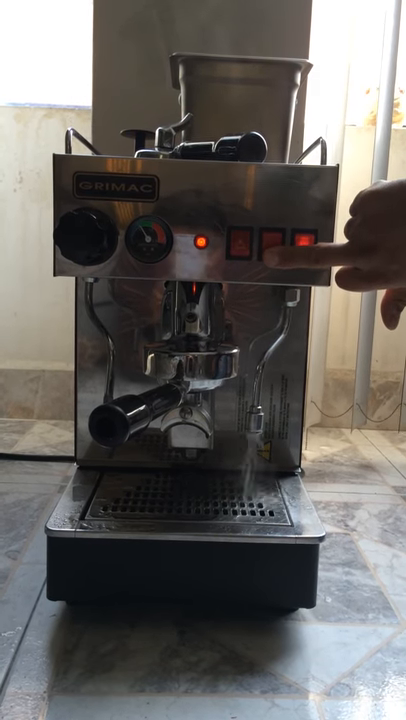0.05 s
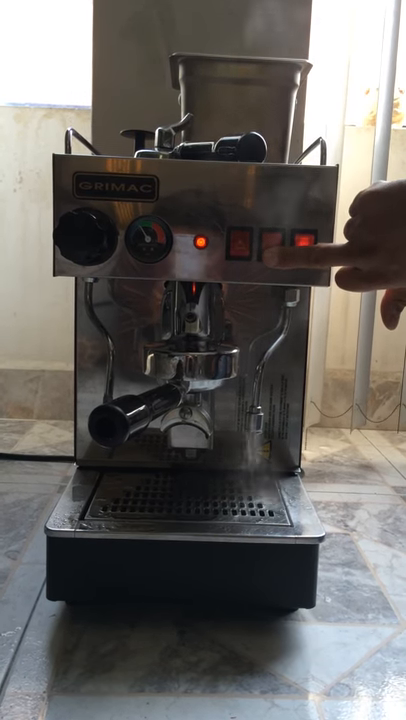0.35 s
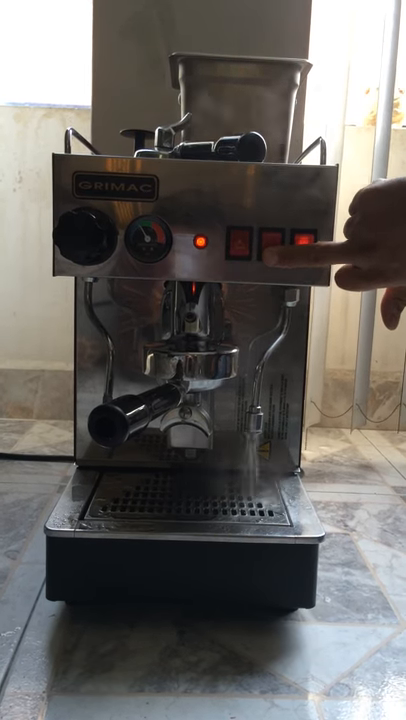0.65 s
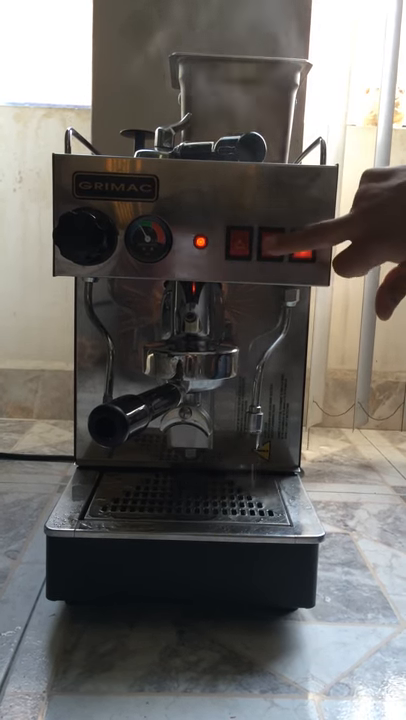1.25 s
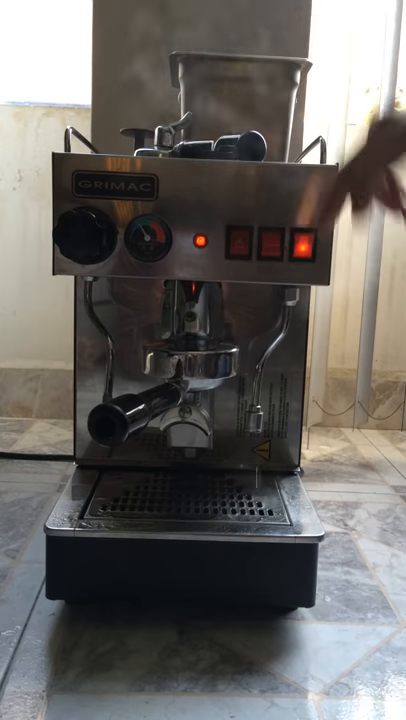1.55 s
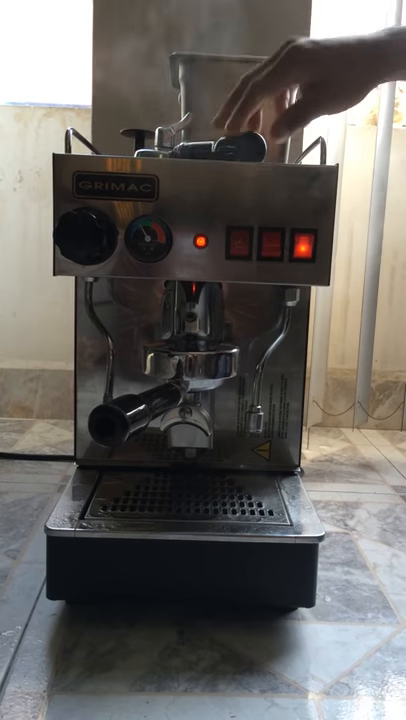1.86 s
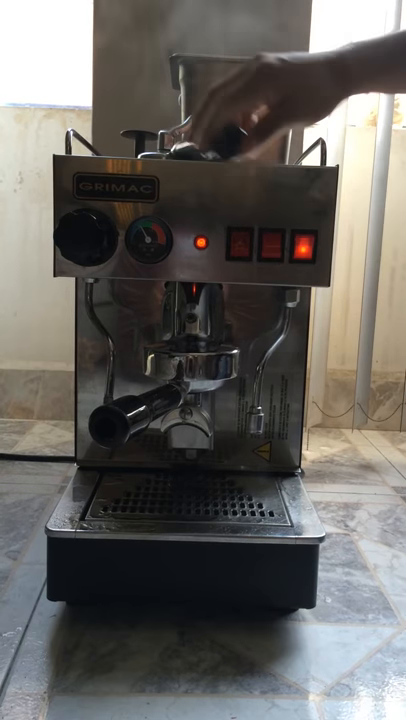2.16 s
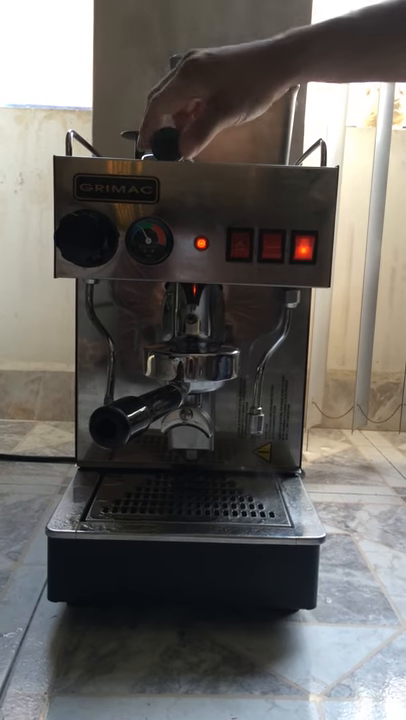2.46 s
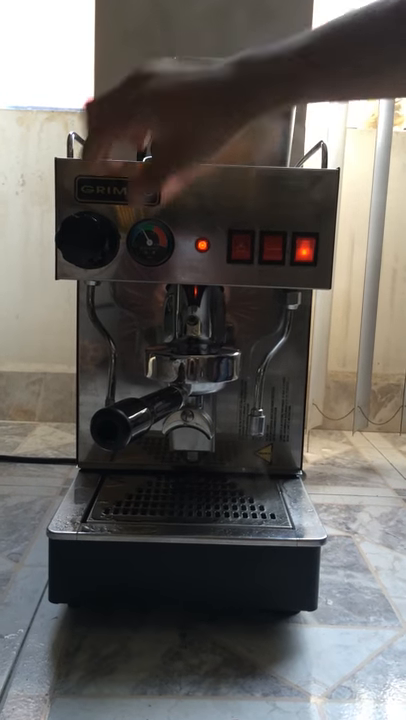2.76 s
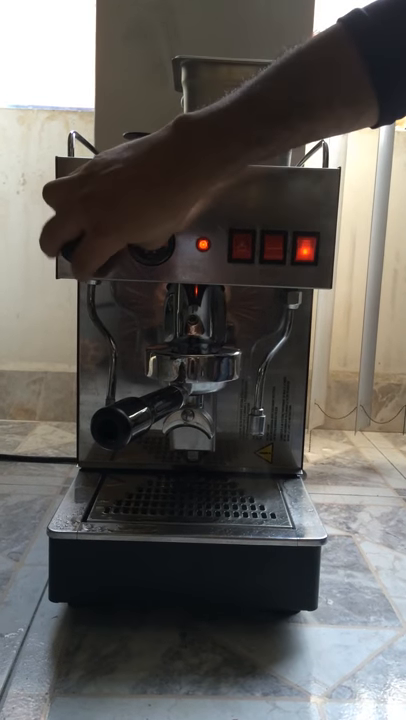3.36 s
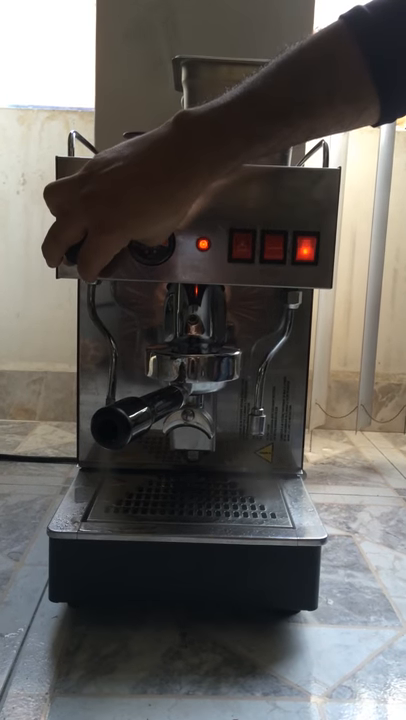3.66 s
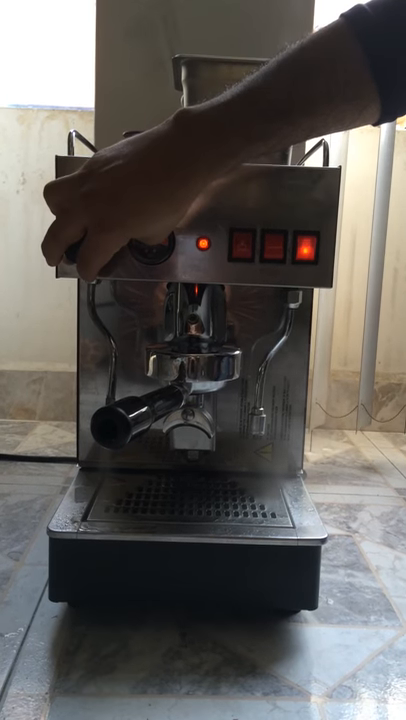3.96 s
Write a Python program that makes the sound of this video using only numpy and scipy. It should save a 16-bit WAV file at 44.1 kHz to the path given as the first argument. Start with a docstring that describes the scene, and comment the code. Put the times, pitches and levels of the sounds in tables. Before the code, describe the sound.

An espresso machine spits water, then blasts hissing steam after a metal lever clack.

```python
"""A tiled room, one microphone close to an espresso machine. Boiling water sputters from the spout
into the drip tray and is shut off. A lever on top scrapes round its seat and clacks home, ringing
the metal and thumping the case; then the steam valve is turned open and the jet hisses hard from
the wand. Under it all: a low hum, a thin boiler sizzle and faint ticks."""
import sys
import numpy as np
from scipy import signal
from scipy.fft import rfft, irfft
from scipy.io import wavfile
from scipy.ndimage import uniform_filter1d

SR = 44100
rng = np.random.default_rng(int(sys.argv[2]) if len(sys.argv) > 2 else 0)


def pcm_store(signal):
    """Save signal as 16-bit PCM."""
    levels = np.round(np.clip(np.atleast_2d(signal), -1, 1) * 32767)
    wavfile.write(sys.argv[1], SR, levels.astype(np.int16).T)


N = 176400

# Levels in the tables are relative; a tone is a spectrum, its levels given per hertz.
ROOM_DECAY = [(100, 0.7), (500, 0.52), (2000, 0.38), (5000, 0.33), (15000, 0.25)]  # reverberation off the tiles: frequency_hz, t60_s

SPURTS = [(0, 0.017, 0.5), (.021, 0.0076, 0.5), (.036, 0.0061, 0.5), (.046, 0.011, 0.5),
          (.069, 0.018, -3.5), (.096, 0.024, 0), (.128, 0.014, -2), (.154, 0.016, 1), (.181, 0.023, -3),
          (.198, 0.018, -4.5), (.222, 0.013, 3), (.2575, .015, 1), (.278, 0.026, 1.5), (.31, 0.0096, 0.5),
          (.328, 0.013, 1), (.347, 0.024, 1), (.381, 0.02, 0.5), (.404, 0.014, -1.5), (.428, 0.011, -0.5),
          (.458, 0.003, 2), (.466, 0.011, -1), (.498, 0.022, 1.5), (.536, 0.0035, 3), (.545, 0.0076, -2.5),
          (.559, 0.021, -0.5), (.583, 0.0076, -3.5), (.598, 0.011, 2), (.627, 0.014, 1.5),
          (.649, 0.019, -4), (.666, 0.019, -1), (.696, 0.033, 1.5), (.741, 0.011, 0), (.756, 0.016, -1),
          (.779, 0.025, -3.5), (.819, 0.007, -3.5), (.835, 0.024, -5.5)]  # spurts of water and steam: start_s, length_s, level_db
STEAM_POCKETS = [(0.07, -27.5), (.132, -23.5), (0.225, -20.5), (0.232, -22.5), (0.26, -17), (0.31, -20),
                 (0.319, -14.5), (0.395, -17), (0.539, -19), (0.563, -20), (0.57, -23.5), (0.628, -17),
                 (.636, -17), (0.697, -17), (.703, -17), (0.722, -23), (.759, -16.5), (0.766, -20),
                 (.801, -19.5)]  # pockets bursting in the spout: time_s, level_db
SPRAY_TONE = [(41, -36), (70, -9.5), (104, -19), (151, -13), (215, -20.5), (306, -29), (387, -10.5),
              (445, -11.5), (481, -30), (563, -5), (609, -18), (672, -8), (957, -32.5), (1170, -13.5),
              (1310, -25.5), (1510, -8), (2560, -7), (3060, -14.5), (3240, -9), (3790, -5), (4350, 2),
              (5000, -6.5), (5300, -9), (6980, -12.5), (7700, -23), (10000, -52)]  # water leaving the spout: frequency_hz, level_db
SPOUT_MODES = [(2139, 43, -6), (2504, 32, -11), (2625, 18, -7), (3261, 91, -5.5), (4470, 240, -2),
               (4990, 37, -2.5), (5650, 310, -8.5), (6350, 130, -11.5)]  # resonances of the spout: pitch_hz, width_hz, level_db
SPLASH_TONE = [(60, -14), (170, 2.5), (300, -11.5), (420, -4), (680, 1.5), (950, -9), (1700, -4),
               (2600, 4.5), (4000, -21)]  # water on the tray: frequency_hz, level_db
MIST_TONE = [(6500, -5.5), (8700, -0.5), (10500, -4), (12500, -3), (14600, 1), (15400, -0.5)]  # fine spray of each spurt: frequency_hz, level_db
# a knock as the water shuts off, then a faint switch click: start_s, length_s, level_db
KNOCK_AND_CLICK = [(.926, .006, -39.5), (1.091, 0.01, -62.5)]
KNOCK_TONE = [(250, -9), (600, -13), (1000, 3.5), (1600, 4), (2400, -7), (3200, -0.5), (4500, -7),
              (7000, -18), (15000, -33)]  # that knock and click: frequency_hz, level_db

RUMBLE_TONE = [(25, -9), (45, -4), (80, 2), (140, 2.5), (200, -7), (290, -13), (400, -10), (500, -8.5),
               (620, -16), (800, -23.5)]  # room rumble: frequency_hz, level_db
RUMBLE_LEVELS = [(0, -53), (1.4, -55.5), (2.1, -54.5), (3.1, -54.5), (4, -57)]  # its slow drift: time_s, level_db
AIR_TONE = [(700, 0), (1000, -2.5), (1500, -2.5), (2200, -3), (3000, -8), (4500, -11), (7000, -17),
            (10000, -19.5), (15400, -21)]  # steady room hiss: frequency_hz, level_db
HUMS = [(1.04, 1.446, 98.4, 5.02, -47.5), (1.5, 1.7, 96.5, 3.05, -49), (1.68, 1.846, 153.8, 2.97, -51),
        (1.9, 2.32, 150.3, 2.97, -49.5), (.97, 1.55, 140.4, 25, -54), (1.3, 1.62, 51.6, 15, -55),
        (0, 3.5, 240, 3, -68), (0, 4.6, 333, 4, -67.5), (0, 3.1, 447, 5, -65.5), (0, 3.6, 500, 40, -67),
        (0, 4.1, 2070, 140, -78), (0, 2.3, 2075, 50, -73), (2.135, 2.215, 8915, 120, -78)]  # hums, sizzle and a brief squeak: start_s, end_s, pitch_hz, width_hz, level_db
RINGING_TICKS = [(1.093, -52), (1.304, -59), (1.446, -59), (1.684, -60), (1.966, -60), (2.04, -56),
                 (2.159, -53.5), (2.2713, -50.5), (2.521, -52), (2.721, -50.5), (2.822, -52.5),
                 (2.891, -51.5), (3.036, -51.5), (3.107, -52.5)]  # faint ticks that ring: start_s, level_db
DRY_TICKS = [(1.502, -60), (1.647, -55.5), (1.94, -54.5), (2.866, -60)]  # thin dry ticks: start_s, level_db

LEVER_SLIDES = [(2.2925, 0.026, -40.5), (2.314, 0.044, -39.5), (2.355, 0.013, -46.5)]  # the lever on its metal seat: start_s, length_s, level_db
SCRAPE_TONE = [(130, -4), (200, 10.5), (330, 3), (700, -7.5), (1000, 4), (1450, -6.5), (1850, 1.5),
               (2300, -5.5), (2650, -1.5), (3600, -9), (7000, -12.5), (10000, -19), (15000, -23)]  # its friction: frequency_hz, level_db
CASE_MODES = [(146.7, -1.5, 0.15), (177, 0.5, 0.22), (214.8, 1.5, .19), (387, 0, 0.069), (573, -5, 0.14)]  # resonances of the case: pitch_hz, level_db, t60_s
LEVER_HITS = [(2.5652, 0.0065, -32, -40), (2.5743, 0.014, -33, -39), (2.5945, 0.01, -37, -33),
              (2.60944, 0.0099, -36, -41), (2.6282, 0.0043, -52, -33.5)]  # hit on the stop and rebounds: start_s, length_s, level_db, thump_db
LEVER_MODES = [(815, -5, 0.1), (1052, 0, .1), (1093, -1.5, .07), (1277, -1.5, 0.12), (1540, -3, 0.1),
               (1880, -5, .08), (2012, 4.5, 0.115), (2482, -3, .1), (3101, -9, .13), (3327, -11, .13),
               (4210, -14, 0.13), (5475, -16, 0.15), (5798, -17, .19)]  # resonances of the lever: pitch_hz, level_db, t60_s
CRACK_TONE = [(200, -18), (550, -2), (720, -5), (1080, 6.5), (1500, -3.5), (2000, 1.5), (2250, -8),
              (2500, -1), (3000, -7.5), (6000, -15), (9000, -22), (15000, -27)]  # lever meeting stop: frequency_hz, level_db

STEAM_VALVE = [(3.286, -79, -90), (3.298, -50.5, -65), (3.335, -45, -60), (3.372, -36, -57.5),
               (3.45, -32.5, -54), (3.567, -27, -44.5), (3.588, -21, -39), (3.66, -21.5, -37),
               (3.85, -21.5, -38.5), (4, -23, -42)]  # the valve opening: time_s, hiss_db, rush_db
HISS_TONE = [(1470, -42), (2500, -13.5), (2760, -10), (3340, -6), (5500, -4.5), (6050, -5), (7710, -3.5),
             (8600, -0.5), (9760, -0.5), (10300, 1.5), (11800, 0), (12700, -3.5), (13300, 2.5), (15200, 1)]  # hiss of the steam jet: frequency_hz, level_db
RUSH_TONE = [(130, -4), (260, -10.5), (400, 1), (700, -1), (1050, -6.5), (1250, -7.5), (1560, 1.5),
             (2000, -6), (2400, -5), (3000, -13.5)]  # its low rush: frequency_hz, level_db
WAND_MODES = [(3420, 300, -27.5), (4080, 260, -22), (5010, 260, -23), (8800, 260, -16)]  # pipe resonances of the wand: pitch_hz, width_hz, level_db

ROOM_BUILD_S, TOP_HZ = 0.0091, 15280
SHUT_S, DRAIN_S, PRESSURE_FALL_S = 0.81, 0.018, 0.092
STREAM_DB, SPRAY_DB, SPOUT_DB, SPLASH_DB = -9, -27.5, -31.5, -41.5
GURGLE_TOP_HZ, GURGLE_VARY_DB, SPOUT_T60_MAX_S = 3300, 2.5, 0.027
MIST_DB, MIST_STREAM_DB, PANEL_ECHO_S, PANEL_ECHO_DB = -36, -12, 0.0004515, -9.5
POP_HZ, POP_S, POP_DB = 4410, 0.0013, 2
AIR_DB, HUM_FADE_S, HUM_WAVER_DB = -69.3, 0.048, 2.5
TICK_HZ, TICK_SCATTER, PING_DB, DRY_TICK_DB = 4530, 0.03, -14.5, -3
SCRAPE_THUMP_DB, RING_DB, CRACK_DB, CLICK_DB = -10.5, -4.5, -6.5, -5
HISS_DB, RUSH_DB, WAND_WAVER_DB = -1.36, -0.5, 1.5


def undb(db):
    """Decibels to gain."""
    return 10 ** (np.asarray(db) / 20)


def clock():
    """Time of each sample in seconds."""
    return np.arange(N) / SR


def unit(x):
    """Scale to rms 1."""
    return x / np.sqrt(np.mean(x ** 2) + 1e-20)


def noise():
    """White noise."""
    return rng.standard_normal(N)


def convolve(x, response):
    """Pass a sound through an impulse response."""
    return signal.fftconvolve(x, response)[:N]


def colour(x, tone, size=2048):
    """Causal filter of unit power through (frequency_hz, level_db) points, steep beyond the ends."""
    hz, db = np.array(sorted(tone)).T
    log_hz = np.log(np.maximum(np.fft.rfftfreq(size, 1 / SR), 1))
    beyond = np.maximum(np.log(hz[0]) - log_hz, 0) + np.maximum(log_hz - np.log(hz[-1]), 0)
    gain = undb(np.interp(log_hz, np.log(hz), db) - 24 * beyond)
    cepstrum = irfft(np.log(gain))
    cepstrum[1:size // 2] *= 2  # fold to minimum phase
    cepstrum[size // 2 + 1:] = 0
    response = irfft(np.exp(rfft(cepstrum)))
    return convolve(x, response / np.linalg.norm(response))


def band(x, hz, width):
    """Steep resonance of unit power."""
    edges = [max(hz - width / 2, 10), min(hz + width / 2, SR / 2 - 10)]
    sos = signal.butter(2, edges, "band", fs=SR, output="sos")
    return signal.sosfilt(sos, x) * np.sqrt(SR / 2 / width)


def ring(x, modes):
    """Drive decaying modes (pitch_hz, level_db, t60_s), together of unit power."""
    t = clock()[:SR // 2]
    response = sum(undb(db - 60 * t / t60) * np.sin(2 * np.pi * hz * t) * (-1) ** k
                   for k, (hz, db, t60) in enumerate(modes))
    return convolve(x, response / np.linalg.norm(response))


def walk(rate_hz):
    """Smooth random wander of rms 1."""
    step = max(int(SR / rate_hz), 2)
    stairs = np.repeat(rng.standard_normal(N // step + 1), step)
    return unit(uniform_filter1d(stairs, step)[:N])


def grains(per_s, spread_db):
    """Random tiny impacts of scattered size."""
    return unit((rng.random(N) < per_s / SR) * np.sign(noise()) * undb(spread_db * noise()))


def bursts(rows, attack_s, release_s):
    """Attack, hold and release for each (start_s, length_s, level_db)."""
    out, t = np.zeros(N), clock()[:SR // 4]
    for start, length, db in rows:
        i = max(int(start * SR), 0)
        shape = undb(db) * np.minimum(t / attack_s, 1) * np.exp(-np.maximum(t - length, 0) / release_s)
        out[i:i + len(t)] = np.maximum(out[i:i + len(t)], shape[:N - i])
    return out


def fall(start_s, decay_s):
    """Hold at 1, then die away."""
    return np.exp(-np.maximum(clock() - start_s, 0) / decay_s)


def taps(times, levels_db):
    """One sharp blow for each time, with the energy of 10 ms at its level."""
    out = np.zeros(N)
    out[(times * SR).astype(int)] = undb(levels_db) * np.sqrt(SR / 100)
    return out


def room(x, wet_db):
    """Direct sound at the microphone plus the tail off the tiles, shorter in the treble."""
    f, t, cells = signal.stft(rng.standard_normal(SR), SR, nperseg=256)
    t60 = np.interp(f, *np.array(ROOM_DECAY).T)
    tail = signal.istft(cells * undb(-60 * t / t60[:, None]), SR)[1][:SR]
    tail *= 1 - np.exp(-clock()[:SR] / ROOM_BUILD_S)
    return x + undb(wet_db) * convolve(x, tail / np.linalg.norm(tail))


def spray(drive):
    """Dense drops leave the spout; their low gurgle differs from spurt to spurt."""
    drops = colour(grains(per_s=5000, spread_db=2) * drive * undb(walk(400)), SPRAY_TONE)
    gurgle = signal.sosfiltfilt(signal.butter(4, GURGLE_TOP_HZ, fs=SR, output="sos"), drops)
    swell = undb(GURGLE_VARY_DB * np.tanh(walk(30)))
    return undb(SPRAY_DB) * (drops + gurgle * (swell - 1))


def spout(drive):
    """Rushing gas rings the spout, and steam pockets burst in it as tiny pips."""
    gas = noise() * drive * undb(0.44 * walk(250))
    modes = [(hz, db, min(4.5 / width, SPOUT_T60_MAX_S)) for hz, width, db in SPOUT_MODES]
    out = undb(SPOUT_DB) * ring(gas, modes)
    for at, db in STEAM_POCKETS:
        detune, turn = rng.standard_normal(2)
        t = clock() - at
        pip = np.sin(2 * np.pi * (POP_HZ * (1 + 0.04 * detune) * t + turn))
        out += undb(db + POP_DB) * np.exp(-(t / POP_S) ** 2) * pip
    return out


def mist(spurts, flow):
    """Bright hiss of each spurt, hollowed by its echo off the steel front; it fades with the pressure."""
    t = clock()
    drive = np.hypot(spurts * fall(SHUT_S, PRESSURE_FALL_S), undb(MIST_STREAM_DB) * flow)
    hiss = colour(noise() * drive * undb(walk(60)), MIST_TONE)
    echo = undb(PANEL_ECHO_DB) * np.interp(t - PANEL_ECHO_S, t, hiss)
    return undb(MIST_DB) * room(hiss + echo, wet_db=-8)


def water():
    """A spurting stream spatters on the tray and shuts off with a knock; then a switch clicks faintly."""
    flow = fall(SHUT_S, DRAIN_S)
    spurts = bursts(SPURTS, attack_s=0.00033, release_s=0.004)
    drive = np.hypot(spurts, undb(STREAM_DB) * flow)
    drops, ringing = spray(drive), spout(drive)
    splash = colour(grains(per_s=1500, spread_db=1) * fall(start_s=0.85, decay_s=0.017), SPLASH_TONE)
    impacts = colour(noise() * bursts(KNOCK_AND_CLICK, attack_s=0.0003, release_s=0.004), KNOCK_TONE)
    jet = room(drops + impacts, wet_db=-8) + room(ringing, wet_db=-18)
    return jet + mist(spurts, flow) + undb(SPLASH_DB) * room(splash, wet_db=-5)


def room_tone():
    """Rumble and hiss of the room, with wavering hums and a thin boiler sizzle that come and go."""
    t = clock()
    rumble = colour(noise(), RUMBLE_TONE, size=16384) * undb(np.interp(t, *np.array(RUMBLE_LEVELS).T))
    out = rumble + undb(AIR_DB) * colour(noise(), AIR_TONE)
    for start, end, hz, width, db in HUMS:
        gate = np.clip(np.minimum(t - start, end - t) / HUM_FADE_S + 0.5, 0, 1)
        phase = 2 * np.pi * np.cumsum(hz + width / 2 * walk(2 * width)) / SR
        out += gate * undb(db + HUM_WAVER_DB * np.tanh(walk(3 * width))) * np.sin(phase)
    return out


def ticks():
    """Faint short ticks, some ringing, each at its own pitch, and some thin and dry."""
    at, db = np.array(RINGING_TICKS).T
    pitches = TICK_HZ * (1 + TICK_SCATTER * rng.standard_normal(len(at)))
    pings = sum(band(taps(start, level + PING_DB), hz, width=700)
                for start, level, hz in zip(at, db, pitches))
    onsets = bursts(zip(at, 0 * at, db), attack_s=0.0001, release_s=0.002)
    clicks = undb(-6.5) * band(noise() * onsets, hz=4600, width=4700)
    dry_rows = [(start, 0, level + DRY_TICK_DB) for start, level in DRY_TICKS]
    snaps = band(noise() * bursts(dry_rows, attack_s=0.0001, release_s=0.003), hz=7300, width=10500)
    return room(pings + clicks + snaps, wet_db=-9)


def lever_scrape():
    """The lever slides over its seat: dense stick-slip grains that also rumble in the case."""
    slip = grains(per_s=6000, spread_db=2.5) * bursts(LEVER_SLIDES, attack_s=0.00061, release_s=0.0086)
    return room(colour(slip, SCRAPE_TONE) + undb(SCRAPE_THUMP_DB) * ring(slip, CASE_MODES), wet_db=-7)


def lever_clack():
    """The lever hits its stop and chatters: each contact cracks, rings the metal and thumps the case."""
    at, length, db, thump_db = np.array(LEVER_HITS).T
    blows = taps(at, db)
    contact = bursts(zip(at, length, db), attack_s=0.00034, release_s=0.0065)
    chatter = grains(per_s=8000, spread_db=1) * contact
    metal = undb(RING_DB) * ring(blows, LEVER_MODES)
    crack = undb(CRACK_DB) * colour(chatter + undb(CLICK_DB) * blows, CRACK_TONE)
    thump = undb(-0.5) * ring(taps(at, thump_db), CASE_MODES)
    return room(metal, wet_db=-13) + room(crack, wet_db=-6) + room(thump, wet_db=-8.5)


def steam():
    """The jet hisses and rings the wand as the valve opens; a fluttering low rush swells beneath."""
    t = clock()
    at, hiss_db, rush_db = np.array(STEAM_VALVE).T
    jet = undb(np.interp(t, at, hiss_db) + HISS_DB)
    hiss = colour(noise(), HISS_TONE) * jet * undb(0.4 * walk(150))
    rush = colour(noise(), RUSH_TONE) * undb(np.interp(t, at, rush_db) + RUSH_DB + 1.23 * walk(40))
    wand = jet * sum(band(noise(), hz, width) * undb(db + WAND_WAVER_DB * walk(13))
                     for hz, width, db in WAND_MODES)
    return room((hiss + wand + rush) * (t > at[0]), wet_db=-8)


def scene():
    """Everything at the one microphone, the same on both channels."""
    mono = water() + room_tone() + ticks() + lever_scrape() + lever_clack() + steam()
    return np.tile(mono, (2, 1))


def record(dry):
    """The recorder cuts the top treble steeply."""
    return signal.sosfilt(signal.ellip(14, 0.2, 80, TOP_HZ, fs=SR, output="sos"), dry)


dry = scene()
out = record(dry)
pcm_store(out)
```